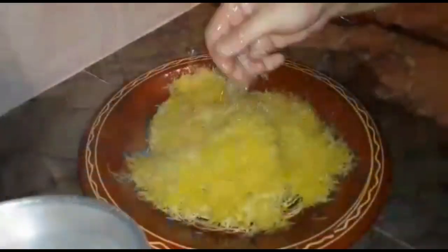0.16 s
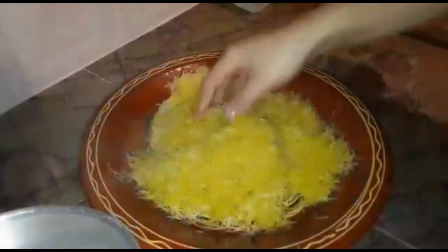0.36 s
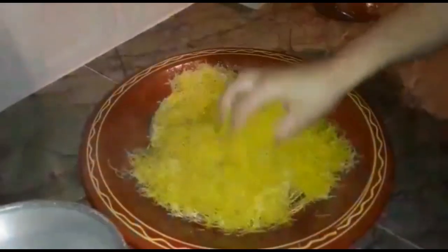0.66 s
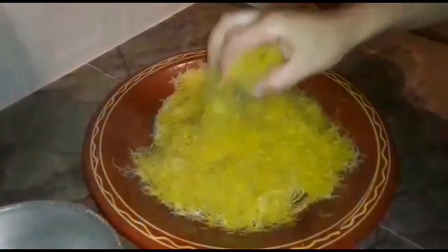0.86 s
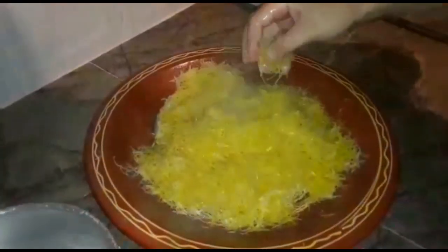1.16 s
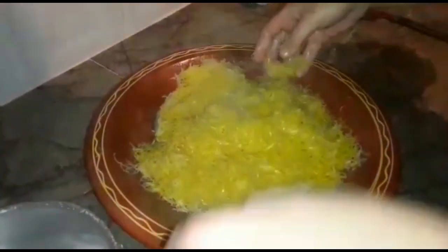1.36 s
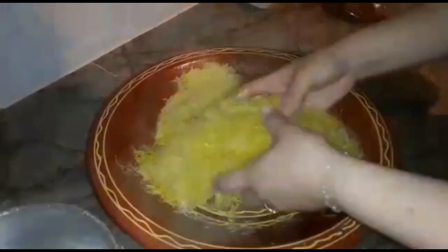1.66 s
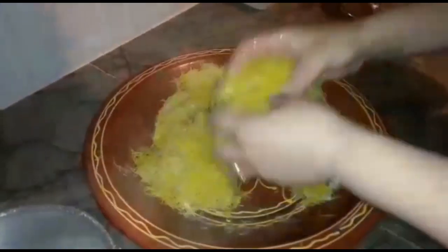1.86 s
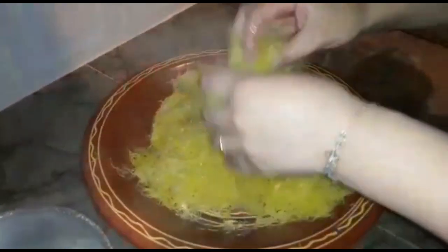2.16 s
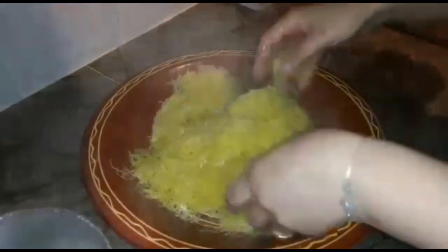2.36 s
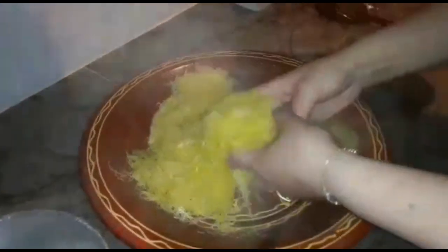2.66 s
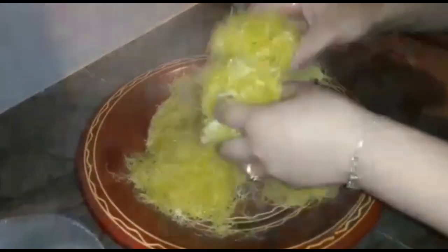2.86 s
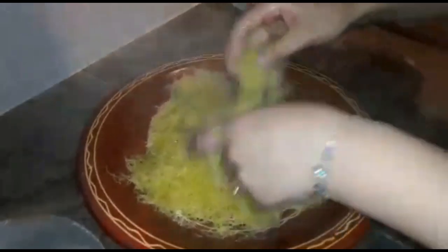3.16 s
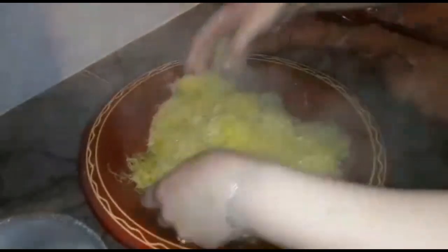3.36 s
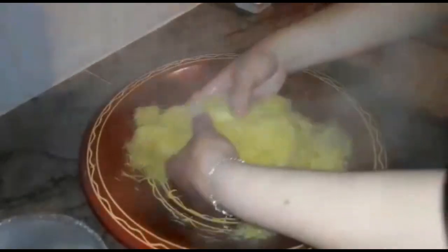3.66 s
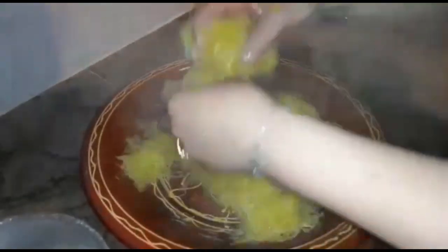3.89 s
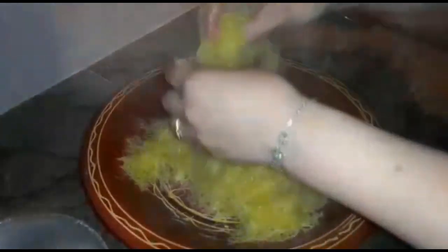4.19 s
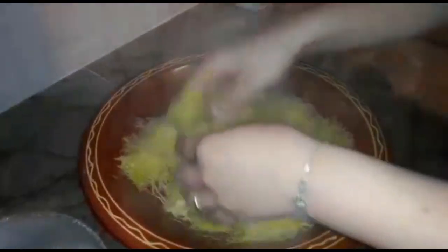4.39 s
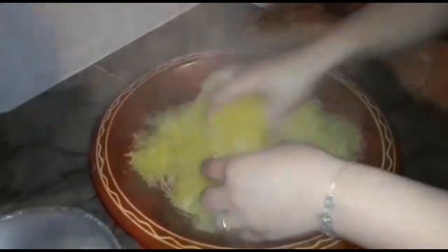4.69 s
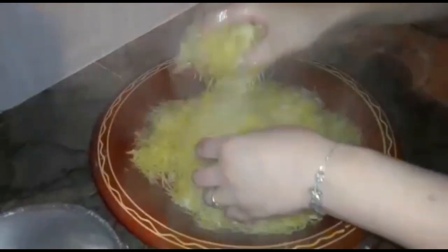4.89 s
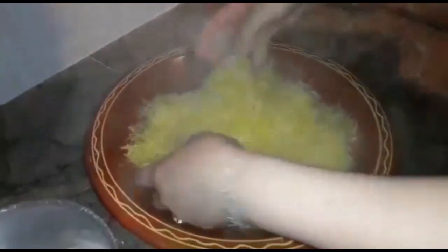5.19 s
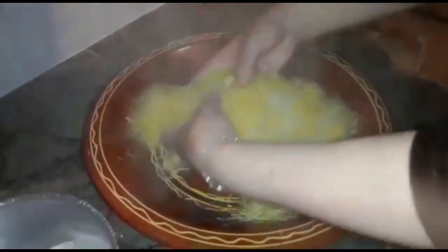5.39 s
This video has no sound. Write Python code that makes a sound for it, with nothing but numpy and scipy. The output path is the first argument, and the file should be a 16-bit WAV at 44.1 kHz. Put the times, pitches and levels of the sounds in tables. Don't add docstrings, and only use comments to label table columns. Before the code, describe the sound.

A camera near the dish catches a dense burst of crisp droplets and tiny ringing bubbles, then sparse wet snaps as fingers stir noodles. Nearby a lid, a cupboard and several plates are struck, ringing briefly and rocking to rest in a short, hard room echo. Soft hum and steady steam hiss lie behind, and a last faint plate clink comes near the end.

```python
import sys
import numpy as np
from scipy import signal
from scipy.fft import rfft, irfft
from scipy.io import wavfile
from scipy.ndimage import uniform_filter1d, map_coordinates

SR = 44100
rng = np.random.default_rng(int(sys.argv[2]) if len(sys.argv) > 2 else 0)


def elevation(decibels):
    levels = np.asarray(decibels, float)
    return 10 ** (levels / 20)


def inscribe(sig):
    pcm = np.round(np.clip(np.atleast_2d(sig).T, -1, 1) * 32767)
    wavfile.write(sys.argv[1], SR, pcm.astype(np.int16))


N = 243985

# f/Hz, level/dB (per Hz)
HUM_COLOUR = [(15, -64), (33, -26), (42, -12.5), (86, 1.5), (114, -5.5), (175, -7), (209, -8), (244, -5),
              (453, -11), (895, -20.5), (954, -23), (1100, -21), (1430, -45), (2420, -120)]
HISS_COLOUR = [(900, -12), (1150, -46), (1800, -14.5), (2520, -22), (3020, -10.5), (4030, -9), (5500, -6.5),
               (7200, -9), (8200, -19), (9600, -15), (10600, -5.5), (11100, -9), (14000, -11.5),
               (15400, -8.5), (15650, -28)]
WHISTLE_COLOUR = [(1080, -16), (1200, -10.5), (1290, -2.5), (1350, -10), (1450, -0.5), (1540, -5.5),
                  (1700, -21.5)]
RUSTLE_COLOUR = [(700, -47), (1500, -7), (2500, 4.5), (3800, 1.5), (5000, -6.5), (7000, -6), (9000, -28)]
# t/s, level/dB
STEAM_PRESSURE = [(0.0, -61.5), (0.95, -63), (1.2, -70), (1.32, -65.5), (1.99, -66), (3.43, -63.5),
                  (3.54, -63), (5.08, -62.5), (5.53, -62)]
# t/s, length/s, level/dB
FINGER_STROKES = [(0, 0.46, -67), (1.198, 0.11, -50.5), (1.3, 0.39, -62), (1.96, 0.19, -59.5),
                  (2.895, 0.017, -64), (3.031, 0.027, -60), (3.1, 0.32, -83), (3.6, 0.53, -67.5),
                  (3.928, 0.12, -69), (4.154, 0.62, -63), (4.333, 0.79, -74), (4.655, 0.42, -66.5),
                  (5.297, 0.54, -54.5)]

# t/s, level/dB, f/Hz, t60/s, pitch rise/1
BUBBLES = [(.003, -29.5, 2205, 0.025, 0.03), (.02, -39, 2220, 0.021, 0.024),
           (.014, -34.5, 6440, 0.02, 0.091), (0.053, -33, 6140, .012, .04), (.069, -27, 7200, 0.017, 0.14),
           (0.086, -32, 5300, 0.018, 0.07), (.096, -30, 5600, 0.015, 0.18),
           (.174, -33.5, 3940, 0.042, 0.088), (.213, -38.5, 3650, 0.031, 0.027),
           (.293, -39.5, 3660, 0.028, 0.051), (0.312, -29, 5600, 0.013, 0.17), (.35, -40, 5000, .015, .02),
           (0.399, -43.5, 3300, 0.061, 0.021), (1.276, -29, 2450, 0.018, 0), (1.51, -45, 75, 0.45, 0),
           (1.564, -32, 314, 0.082, 0), (1.718, -44, 1370, .05, 0.02), (1.731, -37.5, 1410, 0.059, 0.02),
           (2.415, -50, 3530, 0.03, 0.028), (3.033, -53, 3000, 0.027, 0), (3.033, -51, 3800, .02, 0.026),
           (3.806, -41, 5260, .015, 0.0051), (5.475, -36.5, 2280, 0.081, 0.093),
           (5.489, -37, 2400, 0.046, 0), (5.493, -45, 2850, 0.03, 0.08), (5.503, -52, 2420, .07, 0)]
# t/s, peak level/dB, level of the duller part/dB, fizz f/Hz
SPRINKLES = [(.006, -32.5, 4, 14000), (.037, -33, -7, 10700), (.07, -19, -19, 12500),
             (.076, -23, -18, 12400), (.0874, -32, -1, 14900), (.0974, -28, -13, 11600),
             (0.116, -30, -24, 11900), (.1264, -34, -19, 11600), (.143, -49, -5, 11100),
             (.174, -28.5, 3.5, 13000), (0.211, -31, 2, 10900), (.216, -30.5, 2, 11500),
             (.223, -25, -5, 14500), (.2364, -33, -16, 12500), (0.262, -33, -1, 12300),
             (0.2744, -28, -17, 12400), (0.297, -34, 2, 11500), (.314, -28, -1, 14000),
             (.326, -32, -9, 11000), (.364, -35, -13, 13000), (.3945, -34, -15, 14900),
             (0.396, -31.5, 3.5, 10900), (.405, -32, -1, 10600), (.408, -31, -2, 12400),
             (0.418, -38, 13, 14900), (.4224, -36, -8, 11900), (.4294, -45, 9, 11600)]
# t/s, peak level/dB, level of the duller part/dB
STRAND_RELEASES = [(0.557, -33.5, -11), (.675, -36.5, -3), (.787, -34.5, -16), (.849, -38, -28),
                   (1.235, -39, 7), (1.28, -28, -14), (1.953, -40, 0), (2.0931, -41, -16),
                   (2.686, -41, -15), (3.034, -40, -6), (3.6583, -34, -17), (3.8065, -37, -12),
                   (3.847, -39, -23), (3.9335, -36, -1), (3.9414, -37, -2), (4.2592, -44, -16),
                   (4.298, -51, -8), (4.453, -41, -3), (4.626, -36, -16), (4.693, -41, -12),
                   (4.762, -39.5, -11), (5.42, -37, -18), (5.4442, -35, 5), (5.462, -34, -20),
                   (5.478, -38, -20), (5.495, -38, -15), (5.502, -41, -18), (.726, -38, -26)]
# share of the fizz f/1, level/dB
FIZZ_COLOUR = [(.55, -13), (.8, -12), (1.0, -7.5), (1.25, -7), (1.7, -29)]
# f/Hz, level/dB (per Hz)
DULL_COLOUR = [(2500, -34), (4000, -4), (6000, -2.5), (7500, -1.5), (8500, -39)]
CONTACT_COLOUR = [(6000, -24), (10000, -12), (13000, 6), (15300, 7), (15700, -20)]

# t/s, peak level/dB, crack level over the ring/dB, crack t60/s, room level/dB
BLOWS = [
    (1.0191, -11, 7, 0.043, -7),
    (1.2443, -2.5, -6, 0.034, -8),
    (1.5784, -14.5, 7, 0.026, -5),
    (2.4971, -22, 8, 0.022, -1),
    (3.406, -18.5, 7, 0.029, -0.5),
    (5.2509, -30, 12, 0.016, 2.5),
]
# delay/s, level over the knock/dB
FAR_RIM = [(0.0031, -3), (.003, -7), (.0035, 5.5), (.0045, -2), (.0035, 4.5), (.003, 9)]
# f/Hz, level/dB, t60/s
LID_RING = [(181, -1.5, 0.037), (258, -4, 0.099), (329, 2.5, 0.1), (398, 8, 0.062), (537, -4.5, 0.092),
            (649, -0.5, 0.071), (807, -3.5, 0.06), (1023, -15, 0.17), (1393, -9, 0.12),
            (1757, -12.5, 0.075), (2110, -18.5, 0.099), (2580, -0.5, 0.027), (3675, -7, 0.057),
            (4430, -10.5, 0.054), (5600, -11.5, 0.087), (6800, -3.5, 0.025), (7500, -10.5, 0.075), ]
CUPBOARD_RING = [(145.6, -13, 0.175), (205, -1, 0.053), (291, 7.5, 0.039), (338, -16, 0.088),
                 (394, -9, 0.12), (244.3, -15, 0.18)]
PLATE_A_RING = [(153, -19.5, 0.13), (234, -30, 0.045), (785, -10, 0.012), (1100, -2, 0.022),
                (1835, -7, 0.033), (2536, 0, 0.036), (2503, -19, 0.21), (1510, -10.5, 0.021),
                (3240, -12.5, 0.1), (3640, -12, 0.09), (4260, -8.5, 0.045), (5330, -3, 0.019),
                (6130, 6, 0.023), (7100, -5.5, 0.036), (7887, -19, 0.11), (10770, -8, 0.052)]
PLATE_B_RING = [(840, -32, 0.034), (1186, -9.5, 0.021), (398, -41, 0.068), (1778, -2.5, 0.029),
                (2470, -3, 0.039), (2860, -29, 0.038), (3294, -9.5, 0.04), (4180, -0.5, 0.023),
                (4000, -6.5, 0.024), (5130, -3.5, 0.025), (5940, -5.5, 0.031), (7000, -11.5, 0.085),
                (10320, -11, 0.049)]
PLATE_C_RING = [(322, -17, 0.055), (1280, -6, 0.019), (1776, -14.5, 0.082), (2503, -14.5, 0.11),
                (2650, -16, 0.018), (3300, -10, 0.096), (4010, -5.5, 0.059), (5400, -17, 0.015),
                (5860, -8, 0.02), (7110, -2.5, 0.018), (9750, -11, 0.026)]
PLATE_D_RING = [(332, -9, 0.066), (817, -15, 0.14), (1210, 3, 0.021), (1840, -9, 0.074),
                (2443, -13.5, 0.25), (2603, -1.5, 0.033), (3130, -4, 0.11), (3950, -16, 0.018),
                (4500, -6.5, .02), (5350, -8, 0.017), (6130, 8, 0.021), (7010, -1, 0.019)]
# f/Hz, level/dB (per Hz)
CRACK_COLOURS = [
    [(59, -58), (100, -5), (386, -7), (1290, -14), (1760, -19), (1920, -31), (2420, -16.5), (3120, -21),
     (5750, -21), (15500, -28)],
    [(450, -35), (600, 10), (850, 11.5), (1300, 2), (1900, -10), (2500, -5.5), (4500, -6), (6900, -1.5),
     (8500, -9.5), (11000, -12), (15500, -6)],
    [(88, -51), (150, -38), (781, -2.5), (1340, -28), (1800, 2.5), (2140, -18), (2500, -4), (5650, -10),
     (6230, -13), (15500, -14)],
    [(120, -53), (200, -15), (1330, -7), (1740, 2), (2060, -7), (3240, 5.5), (4580, -12), (5110, -5.5),
     (10400, -5.5), (15500, -19)],
    [(120, -46), (200, -17), (1230, -11.5), (1510, -19), (1710, -10), (2090, -10), (2800, -4.5),
     (3300, -6.5), (4000, -7), (4600, -14), (5200, -5.5), (6000, -10.5), (8500, -14), (11800, -15),
     (15500, -12)],
    [(120, -35), (200, -1), (1230, -17), (1560, -6), (1780, -8), (2170, -6), (3070, -1.5), (3800, -3),
     (4900, -5.5), (7500, -10.5), (12500, -19.5), (15500, -17), (16500, -14)],
]
# t/s, level/dB, f/Hz, t60/s
ROCKING = [(1.033, -16, 1762, 0.12), (1.08, -33.5, 1760, 0.19), (1.044, -14, 403, 0.29),
           (1.05, -22.5, 819, 0.19), (1.026, -26, 2126, 0.065), (1.5825, -17, 6130, 0.026),
           (1.596, -27, 6000, 0.034), (1.644, -42, 6050, 0.067), (1.583, -24, 2650, .03),
           (1.586, -28, 1840, 0.084), (1.605, -30, 1830, 0.063), (1.638, -29, 2550, 0.056),
           (1.639, -32, 1830, .07), (1.677, -45, 2500, 0.044), (1.714, -46, 2490, 0.077),
           (2.5, -29, 1760, 0.054), (2.503, -31, 3270, .03), (2.528, -27, 2455, 0.06),
           (2.532, -37, 4048, 0.076), (2.535, -34, 3290, 0.075), (2.56, -39, 1750, 0.045),
           (2.56, -41, 2487, .04), (2.52, -46, 5146, .12), (3.41, -29, 4037, .04),
           (3.413, -33, 3320, 0.046), (3.424, -26, 3330, 0.064), (3.44, -35, 2360, 0.069),
           (3.46, -30.5, 2450, 0.1), (3.485, -43, 1744, .04), (3.415, -33, 1774, 0.1),
           (5.2525, -33, 4000, 0.033), (5.264, -40, 6050, .025), (5.329, -54, 3180, 0.087),
           (5.265, -41, 2444, .05), (5.273, -39, 3050, 0.066), (5.286, -29, 2444, 0.081),
           (5.329, -39, 2490, .05)]

# f/Hz, t60/s
ROOM_T60 = [(150, 0.36), (600, 0.43), (2500, 0.36), (6000, 0.24), (12000, 0.19)]
# delay/s, level/dB
WALL_ECHOES = [(.0037, -7), (0.011, -8.5), (0.0194, -11), (0.0287, -17), (.0365, -19), (0.0603, -18)]
# f/Hz, level/dB
MIC_PORT = [(200, -1), (7300, 2.5), (8400, -4), (9500, 1.5), (10600, 3.5), (12000, 3.5), (15600, -11),
            (15900, -14), (16300, -31)]


def unit(x):
    return x / np.sqrt(np.mean(x ** 2) + 1e-20)


def along(points, hz):
    f, value = np.transpose(points)
    return np.interp(np.log(hz + 1), np.log(f + 1), value)


def coloured(x, spectrum):
    hz = np.fft.rfftfreq(len(x), 1 / SR)
    inside = (hz >= spectrum[0][0]) & (hz <= spectrum[-1][0])
    return unit(irfft(rfft(x) * elevation(along(spectrum, hz)) * inside, len(x)))


def patchy(depth_db):
    z = signal.stft(rng.standard_normal(N), nperseg=512)[2]
    patches = uniform_filter1d(rng.standard_normal(z.shape), size=5, axis=0)
    patches = uniform_filter1d(patches, size=8, axis=1)
    return signal.istft(z * elevation(depth_db * unit(patches)), nperseg=512)[1][:N]


def wobble(rate):
    points = rng.standard_normal(int(N * rate / SR) + 4)
    return map_coordinates(points, [np.arange(N) * rate / SR])


def swell(t, rise_s):
    return 1 - np.exp(-t / rise_s)


def add(track, s, sound):
    part = track[round(s * SR):][:len(sound)]
    part += sound[:len(part)]


def kitchen(x, wet_db):
    hz, t, z = signal.stft(rng.standard_normal(SR * 3 // 4), SR, nperseg=256)
    t60 = along(ROOM_T60, hz)[:, None]
    fade = elevation(-60 * t / t60) + elevation(-19 - 60 * t / (2.68 * t60))
    tail = signal.istft(z * fade, SR, nperseg=256)[1]
    tail *= swell(np.arange(len(tail)) / SR, 0.0037)
    answer = elevation(wet_db) * tail / np.linalg.norm(tail)
    answer[0] += 1
    for s, db in WALL_ECHOES:
        answer[round(s * SR)] += elevation(db + wet_db)
    return signal.fftconvolve(x, answer)


def house_hum():
    level_db = -54.5
    return elevation(level_db + 0.75 * wobble(rate=3.07)) * coloured(patchy(depth_db=1.3), HUM_COLOUR)


def steam_hiss(drag):
    t = np.arange(N) / SR
    steamer_db, stirred_db = -53.5, -17.5
    sizzle_db, sizzle_t60_s = -51, 2
    steam = elevation(steamer_db) + elevation(sizzle_db - 60 * t / sizzle_t60_s) + elevation(stirred_db) * drag
    return steam * coloured(patchy(depth_db=1.5), HISS_COLOUR)


def steamer_whistle():
    over_pressure_db = 1.5
    pressure_db = np.interp(np.arange(N) / SR, *np.transpose(STEAM_PRESSURE))
    return elevation(over_pressure_db + pressure_db) * coloured(patchy(depth_db=2.0), WHISTLE_COLOUR)


def finger_drag():
    drag = np.full(N, elevation(-69.5))
    for s, length_s, db in FINGER_STROKES:
        add(drag, s, elevation(db) * np.hanning(round(length_s * SR)))
    return drag


def noodle_rustle(drag):
    grains = patchy(depth_db=0.0) * elevation(2.7 * rng.standard_normal(N))
    return drag * coloured(grains, RUSTLE_COLOUR)


def gain_dip():
    t = np.arange(N) / SR
    dip_db, from_s, to_s, fall_s, rise_s = -2, 1.1, 3.5, 0.15, 0.06
    down = np.clip((t - from_s) / fall_s, 0, 1) * np.clip((to_s - t) / rise_s, 0, 1)
    return elevation(dip_db * down)


def background():
    drag = finger_drag()
    steady = house_hum() + steam_hiss(drag)
    return gain_dip() * steady + steamer_whistle() + noodle_rustle(drag)


def bubble_drops():
    out, t = np.zeros(N), np.arange(SR // 8) / SR
    for s, db, hz, t60, climb in BUBBLES:
        tone = np.sin(2 * np.pi * hz * (t + climb * t * t / t60))
        add(out, s, elevation(db - 60 * t / t60) * swell(t, 0.00044) * tone)
    return out


def spatter():
    out, t = np.zeros(N), np.arange(SR // 8) / SR
    strand_fizz_hz, spatter_s = 11800, 0.02
    contact_db, contact_t60_s = 5.5, 0.0027
    for s, db, dull_db, fizz_hz in SPRINKLES + [row + (strand_fizz_hz,) for row in STRAND_RELEASES]:
        clicks = rng.standard_normal((2, len(t))) * elevation(2.4 * rng.standard_normal((2, len(t))))
        fizz = coloured(clicks[0], [(share * fizz_hz, level) for share, level in FIZZ_COLOUR])
        dull = elevation(dull_db - 3.5) * coloured(clicks[1], DULL_COLOUR)
        puff = elevation(db - 5.5 - 46 * t / spatter_s) * swell(t, 0.0014)
        add(out, s - .001, puff * (fizz + dull))
        contact = elevation(db + contact_db - 60 * t / contact_t60_s) * (1 - np.exp(-(t / 0.00032) ** 2))
        add(out, s, contact * coloured(clicks[1], CONTACT_COLOUR))
    return out


def wet_sounds():
    bubbles = bubble_drops()
    near = 0.3 * bubbles
    out = kitchen(bubbles - near + spatter(), wet_db=-7.0)[:N] + near
    return irfft(rfft(out) * (np.fft.rfftfreq(N, 1 / SR) < 15700), N)


def object_ring(modes, rise_s):
    t = np.arange(SR // 2) / SR
    ring = np.zeros(len(t))
    for hz, level, t60 in modes:
        build_s = 0.32 * min(rise_s, .004) + .5 / hz
        ring -= elevation(level - 60 * t / t60) * swell(t, build_s) * np.sin(2 * np.pi * hz * t)
    return ring


def rocking_objects():
    out, t = np.zeros(N), np.arange(SR // 2) / SR
    for s, db, hz, t60 in ROCKING:
        add(out, s, elevation(db - 60 * t / t60) * swell(t, 0.0047) * np.sin(2 * np.pi * hz * t))
    return out


def knocks():
    out, t = np.zeros(N), np.arange(SR // 2) / SR
    far_rim_t60_s = 0.0073
    objects = [LID_RING, CUPBOARD_RING, PLATE_A_RING, PLATE_B_RING, PLATE_C_RING, PLATE_D_RING]
    for blow, (late_s, late_db), modes, colour in zip(BLOWS, FAR_RIM, objects, CRACK_COLOURS):
        s, db, crack_db, t60, wet_db = blow
        rise_s = 0.14 * t60
        ring = object_ring(modes, rise_s)
        rattle = coloured(rng.standard_normal(len(t)), colour)
        crack = elevation(crack_db - 60 * t / t60) * rattle * (1 - np.exp(-(t / rise_s) ** 2))
        add(out, s, elevation(db) * kitchen(0.63 * ring + crack, wet_db))
        far_click = elevation(db + late_db - 60 * t / far_rim_t60_s) * swell(t, 0.00032)
        add(out, s + late_s, far_click * rattle[::-1])
        add(out, s, elevation(db) * 0.3 * ring)
    out += rocking_objects()
    low_cut_hz = 105
    return signal.sosfilt(signal.butter(2, low_cut_hz, "high", fs=SR, output="sos"), out)


def scene():
    close = wet_sounds() + knocks()
    port = elevation(along(MIC_PORT, np.fft.rfftfreq(N, 1 / SR)))
    return (background() + irfft(rfft(close) * port, N))[None]


def roll_off(x):
    return signal.sosfilt(signal.butter(12, 16800, fs=SR, output="sos"), x)


def record(dry):
    return roll_off(dry)


dry = scene()
out = record(dry)
inscribe(out)
```